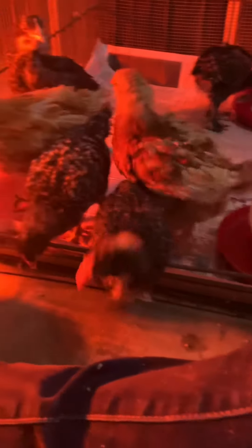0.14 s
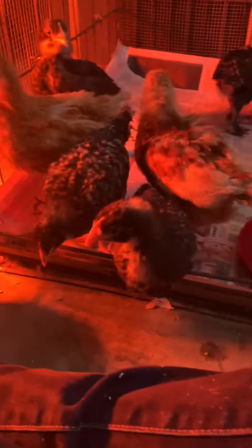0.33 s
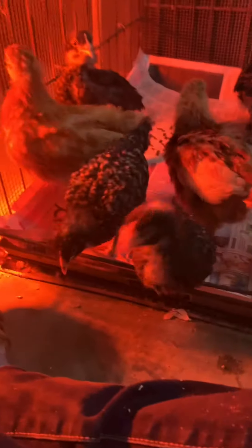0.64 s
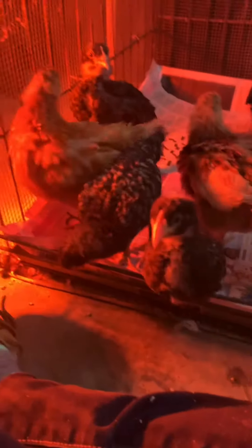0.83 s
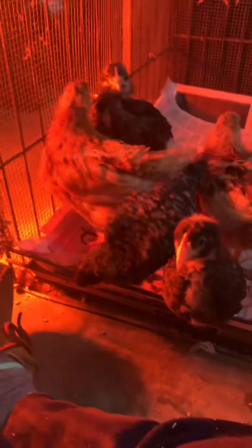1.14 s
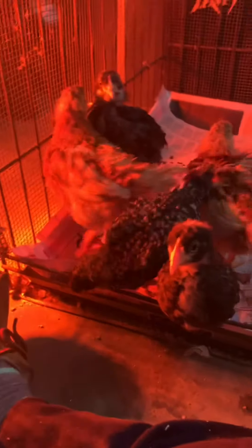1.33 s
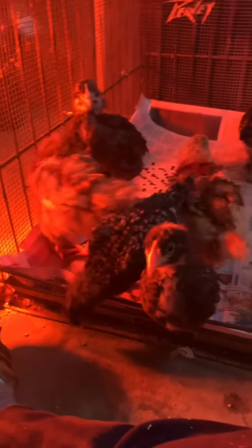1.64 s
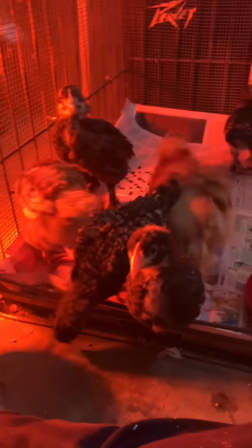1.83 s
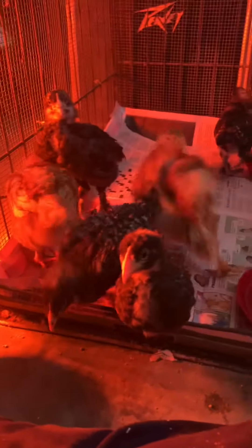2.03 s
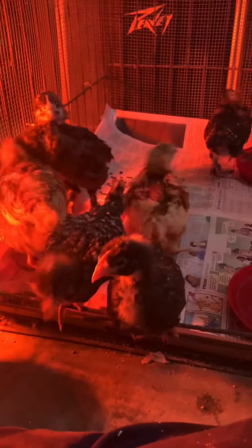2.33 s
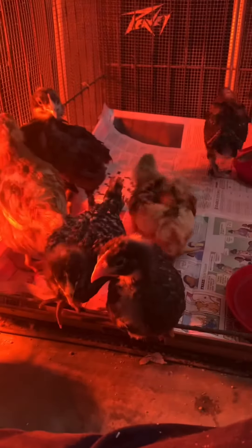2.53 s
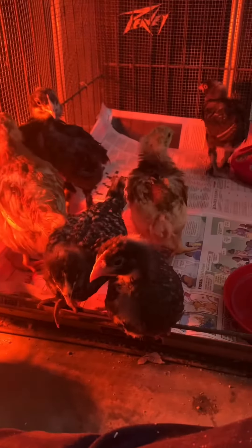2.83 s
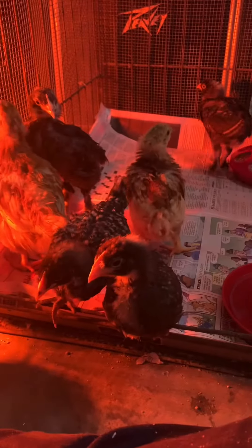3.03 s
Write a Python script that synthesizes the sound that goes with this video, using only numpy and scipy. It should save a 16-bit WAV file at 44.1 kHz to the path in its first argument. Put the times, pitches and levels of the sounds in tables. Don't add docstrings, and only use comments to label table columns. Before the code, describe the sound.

Young chickens chirp over scuffed newspaper and a faint motor hum. Loud snaps come early, a wingbeat hop thumps two-thirds through, then brighter high peeps; captured close in stereo in a small, short-echo room.

```python
import sys
import numpy as np
from scipy import signal
from scipy.fft import rfft, irfft, next_fast_len
from scipy.io import wavfile

SR = 44100
rng = np.random.default_rng(int(sys.argv[2]) if len(sys.argv) > 2 else 0)


def to_wav(s):
    ch = np.atleast_2d(s).T
    pcm = np.round(np.clip(ch, -1, 1) * 32767)
    wavfile.write(sys.argv[1], SR, pcm.astype(np.int16))


def level_to_linear(level):
    exponent = np.asarray(level, float) / 20
    return 10 ** exponent


N = 141120


def peeps(rows, first, turn, bend_in, bend_out, attack, release, octave_db=-17.5, third_db=-45, burr_db=0):
    beak_hz, beak_width_hz = 7060, 1850
    waver_depth, flutter_db = 0.0058, 3
    out, waver, flutter, burr = np.zeros(N), drift(130), drift(76), drift(450)
    for start, length, turn_hz, end_hz, db in rows:
        i, n = int(start * SR), int(length * SR)
        u = np.arange(n) / n
        into_turn = (first - 1) * np.clip(1 - u / turn, 0, 1) ** bend_in
        out_of_turn = np.clip((u - turn) / (1 - turn), 0, 1) ** bend_out
        hz = turn_hz * (1 + into_turn + waver_depth * waver[i:i + n])
        hz = hz + (end_hz - turn_hz) * out_of_turn
        phase = 2 * np.pi * np.cumsum(hz) / SR
        ramp = np.minimum(np.minimum(u / attack, (1 - u) / release), 1)
        shape = np.sin(np.pi / 2 * ramp) ** 2
        octave = level_to_linear(octave_db + 1) * np.exp(-((2 * hz - beak_hz) / beak_width_hz) ** 2)
        tone = np.sin(phase) + octave * np.sin(2 * phase) + level_to_linear(third_db) * np.sin(3 * phase)
        level_db = db + 6.5 + flutter_db * flutter[i:i + n] + burr_db * burr[i:i + n] * (1 - u)
        out[i:i + n] += tone * shape * level_to_linear(level_db)
    return out


# start in seconds, length in seconds, top in Hz, end in Hz, level in dB.
ARCH_PEEPS = [(.22, 0.042, 3705, 3200, -42), (0.487, 0.036, 3590, 3570, -45.5),
              (.586, 0.068, 3557, 2800, -44.5), (.726, 0.072, 3650, 2750, -45.5),
              (2.432, 0.061, 3490, 2960, -37.5), (.632, 0.041, 3620, 3150, -48),
              (.53, 0.049, 3700, 3600, -53.5), (.835, 0.037, 3500, 3300, -53),
              (3.003, 0.0574, 3100, 3200, -56), (.92, 0.055, 3800, 3350, -38.5)]
# start and length in seconds, top and end in Hz, level in dB.
FLICK_PEEPS = [
    (1.185, 0.067, 3630, 2060, -43.5),
    (1.66, 0.041, 3850, 3220, -53.5),
    (2.27, .058, 3360, 2380, -44),
]
# start and length in seconds, top and end in Hz, level in dB.
HIGH_PEEPS = [
    (1.05, 0.046, 4600, 2850, -52.5),
    (2.598, 0.049, 4530, 2640, -39),
    (2.738, 0.053, 4520, 2905, -35),
]
# start and length in seconds,
# top and end in Hz, level in dB.
HELD_PEEPS = [
    (1.152, 0.052, 4590, 3700, -46),
    (1.329, 0.061, 4720, 3200, -43.5),
    (1.825, 0.06, 4580, 3440, -50),
    (2.893, 0.062, 4530, 2920, -39),
]
# start and length in seconds, top and end in Hz, level in dB.
LOW_PEEPS = [
    (2.408, 0.066, 2980, 2060, -47),
    (2.558, 0.068, 2990, 2090, -47.5),
    (2.706, 0.068, 3010, 2105, -49),
]
# start and length in seconds, top and end in Hz, level in dB.
STARTLED_SQUEAK = [
    (2.001, .048, 4600, 2700, -38),
]
# start and length in seconds, first and end pitch in Hz, level in dB.
SLIDE_PEEPS = [(.742, 0.048, 2910, 2086, -48.5), (.88, 0.048, 3000, 2155, -49),
               (.926, 0.028, 4740, 4000, -44), (.972, 0.028, 3455, 2850, -43),
               (1.208, 0.029, 3370, 2996, -39.5), (1.3, 0.052, 3000, 2540, -58.5),
               (1.357, 0.041, 3110, 2160, -49), (1.51, 0.037, 3100, 2140, -48.5),
               (1.603, 0.031, 2795, 2456, -50), (1.78, 0.046, 3050, 2540, -52),
               (2.318, 0.025, 2200, 3360, -46), (2.497, 0.039, 3010, 2270, -60),
               (2.66, 0.021, 3280, 3210, -44.5), (2.671, 0.017, 3466, 3590, -43.5),
               (3.06, 0.0264, 3040, 2140, -54.5), (1.748, 0.037, 2625, 2734, -50),
               (2.437, 0.035, 3913, 3203, -42.5), (1.874, 0.012, 2590, 1850, -38),
               (1.884, 0.018, 2360, 2320, -46.5), (2.785, 0.013, 2640, 2510, -50),
               (2.63, 0.029, 2740, 2520, -53), (.335, 0.094, 3476, 3350, -55.5),
               (1.24, 0.042, 3604, 3550, -52.5), (1.24, 0.049, 3040, 2953, -51),
               (1.455, 0.031, 2553, 2490, -53)]
# start and length in seconds, low point and end in Hz, level in dB.
DIP_PEEPS = [
    (.18, 0.07, 2603, 3260, -41),
    (.338, 0.054, 2783, 2980, -45.5),
    (1.68, 0.043, 3054, 3350, -42.5),
]
# start and length in seconds, low point and end in Hz, level in dB.
SAG_PEEPS = [
    (.508, 0.0243, 2970, 2870, -43),
    (.665, 0.041, 2250, 2400, -46.5),
    (1.775, 0.0594, 2340, 2950, -47.5),
    (.785, 0.039, 3340, 4800, -40),
]
# start and length in seconds, top and end in Hz, level in dB.
SWOOP_PEEP = [
    (2.612, 0.0547, 3840, 3480, -40.5),
]


def flock():
    return (peeps(ARCH_PEEPS, .85, .3, 2.1, 1.85, .18, .14)
            + peeps(FLICK_PEEPS, .68, .247, 1.563, .98, .076, .25)
            + peeps(HIGH_PEEPS, .76, .21, 1.98, 1.45, .31, .15, burr_db=4.5)
            + peeps(HELD_PEEPS, .86, .163, 2.1, 2.9, .2, .081, burr_db=5.5)
            + peeps(LOW_PEEPS, .7, .285, 2.1, 1.4, .27, .12, third_db=-18)
            + peeps(STARTLED_SQUEAK, .45, .6, 1.7, 1.7, .12, .15, octave_db=-30)
            + peeps(SLIDE_PEEPS, 1.063, .04, .87, .98, .21, .19)
            + peeps(DIP_PEEPS, 1.33, .64, 1.6, 1.9, .2, .16)
            + peeps(SAG_PEEPS, 1.12, .68, 1.6, 1.8, .2, .2)
            + peeps(SWOOP_PEEP, .77, .318, 1.62, .71, .89, .15))


# start in seconds, peak level in dB, low knock over the snap in dB.
PECKS = [(0.0494, -33.5, -3.5), (0.1444, -38, -5), (0.302, -19.5, -20.5), (0.9192, -42, 7.5),
         (1.012, -24, -2.5), (1.031, -11.5, -12), (1.3839, -35, -10.5), (1.4554, -44.5, 12.5),
         (1.5213, -38.5, 3), (1.5925, -37.5, -1), (1.8912, -21, -12), (1.8546, -30.5, -4.5),
         (1.8768, -33, -3), (1.924, -43, -1), (2.05, -20, -7.5), (2.1416, -28, 1.5), (2.6618, -40.5, -8.5),
         (3.024, -47, -17)]
# frequency in Hz, density in dB per Hz.
SNAP_SPECTRUM = [(1500, -25), (3000, -6), (5500, 2), (8000, -0.5), (10500, -3), (14000, -7)]


def ticks():
    snap_t60_s, knock_t60_s, knock_hz = 0.0069, 0.058, 1160
    snap, knock, t = np.zeros(N), np.zeros(N), np.arange(2205) / SR
    draws = rng.standard_normal((len(PECKS), 2, len(t)))
    for (start, db, low_db), (snap_noise, knock_noise) in zip(PECKS, draws):
        i = int(start * SR)
        snap[i:i + len(t)] += level_to_linear(db + 3.5 - 60 * t / snap_t60_s) * snap_noise
        knock[i:i + len(t)] += level_to_linear(db + low_db + 7 - 60 * t / knock_t60_s) * knock_noise
    band = signal.butter(1, [knock_hz * 0.64, knock_hz * 2.0], "band", fs=SR, output="sos")
    return colour(snap, SNAP_SPECTRUM) + signal.sosfilt(band, knock)


# start in seconds, level in dB.
FOOTFALLS = [
    (2.059, -25),
    (2.073, -25.5),
    (2.096, -28),
    (2.108, -30),
    (2.144, -29),
    (2.158, -27),
    (2.19, -36),
    (2.215, -40),
    (.921, -35.5),
]
# frequency in Hz, level in dB, decay t60 in seconds.
TRAY_MODES = [(238, -8.5, 0.045), (345, -6.5, 0.058), (475, -3.5, 0.053), (551, -3.5, 0.066),
              (705, -6.5, .05), (1120, -4, 0.047), (1383, -11, .04), (1813, -11.5, 0.039)]


def tray():
    out, luck_db = np.zeros((2, N)), rng.normal(0, 3.0, (len(FOOTFALLS), len(TRAY_MODES), 2))
    start, db = np.transpose(FOOTFALLS)
    for k, (hz, level_db, t60) in enumerate(TRAY_MODES):
        clicks = np.full((2, N), 1e-18)
        clicks[:, (start * SR).astype(int)] = level_to_linear(db + level_db + luck_db[:, k].T)
        r, w = level_to_linear(-60 / (t60 * SR)), 2 * np.pi * hz / SR
        ringing = signal.lfilter([0, np.sin(w)], [1, -2 * r * np.cos(w), r * r], clicks)
        out += ringing * (-1) ** k
    return out


# start in seconds, decay t60 in seconds, level in dB.
WING_BEATS = [
    (2.049, 0.17, -23),
    (2.138, 0.21, -32.5),
]
# frequency in Hz, density in dB per Hz.
WING_SPECTRUM = [(220, -9), (520, 0), (850, -9), (1300, -7), (3000, -14), (9000, -21), (16000, -30)]


def wings():
    t = np.arange(N) / SR
    envelope = np.zeros(N)
    for start, t60, db in WING_BEATS:
        rise = np.clip((t - start) / 0.017, 0, 1) ** 2
        envelope += level_to_linear(db - 60 * np.clip(t - start, 0, None) / t60) * rise
    return envelope * rustle(WING_SPECTRUM, size_db=3.5)


# start in seconds, length in seconds, level in dB.
FOOT_SCUFFS = [(0.045, 0.017, -40.5), (0.212, 0.19, -54), (0.903, 0.068, -44.5), (0.973, 0.067, -37),
               (1.376, 0.048, -44.5), (1.446, 0.13, -52), (1.499, 0.034, -54), (1.711, 0.11, -51),
               (1.813, 0.16, -43), (2.038, 0.035, -30.5), (2.412, 0.12, -54), (1.189, 0.068, -51),
               (2.265, 0.054, -54.5), (2.568, 0.079, -54.5)]
# frequency in Hz, density in dB per Hz.
PAPER_SPECTRUM = [(250, -1), (1300, 0.5), (2500, -6.5), (5000, 5), (9000, -5), (12000, -3), (16000, -18.5)]


def scuffs():
    t = np.arange(N) / SR
    envelope = np.zeros(N)
    for start, length, db in FOOT_SCUFFS:
        u = np.clip((t - start) / length, 0, None)
        envelope += level_to_linear(db) * 2.7 * u / .35 * np.exp(-u / .35)
    return envelope * rustle(PAPER_SPECTRUM, size_db=4.0)


# time in seconds, level in dB.
SHUFFLE_LEVEL = [
    (0, -50),
    (.45, -71.5),
    (.75, -51),
    (1.15, -59.5),
    (1.85, -55),
    (2.3, -61.5),
    (2.75, -59),
    (3.2, -90),
]


def shuffle():
    hiss = rustle([(3000, 5), (9000, -11), (12000, -14.5), (15500, -23.5)], size_db=2.5)
    level_db = np.interp(np.arange(N) / SR, *np.transpose(SHUFFLE_LEVEL))
    return level_to_linear(level_db + 0.87 * drift(2.7)) * hiss


# frequency in Hz, density in dB per Hz.
AIR_SPECTRUM = [(40, -45.5), (62, -6.5), (125, -1.5), (330, -2), (700, -16), (2000, -22.5), (6900, -48.5)]
# frequency in Hz, width in Hz, level in dB.
MOTOR_LINES = [
    (66.7, 12.5, -56.5),
    (123.3, 3.3, -55),
    (173.6, 3.66, -49.5),
    (715.4, 18, -65.5),
]


def fan():
    t = np.arange(N) / SR
    lines = np.zeros(N)
    for hz, width_hz, db in MOTOR_LINES:
        level = level_to_linear(db + 3 + 1.5 * drift(width_hz))
        lines += level * np.sin(2 * np.pi * hz * t + 1.2 * drift(width_hz))
    air = rms_one(spread(colour(rng.standard_normal((2, N)), AIR_SPECTRUM)))
    return level_to_linear(-47.5 + 0.27 * drift(2)) * air + lines


def room(x):
    t60_s, level_db, wall_echo_s = 0.14, -9, 0.052
    t = np.arange(SR // 2) / SR
    shared, own = rng.standard_normal(len(t)), rng.standard_normal((2, len(t)))
    own = signal.sosfilt(signal.butter(3, [1800, 4200], "band", fs=SR, output="sos"), own)
    tail = (shared + 1.35 * own) * level_to_linear(-60 * t / t60_s) * np.clip(t / 0.01, .3, 1)
    tail = tail * (1 + 2.15 * np.exp(-((t - wall_echo_s) / 0.0073) ** 2))
    tail = signal.lfilter([1], [1, -.3], tail)
    tail = tail / np.sqrt(np.sum(tail ** 2) / 2)
    return level_to_linear(level_db) * signal.fftconvolve(x, tail, axes=1)[:, :N]


def rustle(spectrum, size_db):
    grains_per_s = 1500
    size = level_to_linear(size_db * np.minimum(rng.exponential(1, (2, N)), 4))
    grains = (rng.random((2, N)) < grains_per_s / SR) * size
    noise = (grains + .5) * rng.standard_normal((2, N))
    return rms_one(spread(colour(noise, spectrum))) * level_to_linear(3.6 * drift(75))


# frequency in Hz, likeness from 0 to 1.
LIKENESS = [(150, .98), (400, .75), (1000, .92), (2500, .7), (4800, .995)]


def spread(x):
    alike = np.clip(at_hz(LIKENESS, np.fft.rfftfreq(N, 1 / SR)), 0, 1)
    mid = rfft(x[0]) * np.sqrt(.5 + alike / 2)
    side = rfft(x[1]) * np.sqrt(.5 - alike / 2)
    return irfft(np.array([mid + side, mid - side]), N)


def colour(x, points):
    hz = np.fft.rfftfreq(x.shape[-1], 1 / SR)
    gain = level_to_linear(at_hz(points, hz)) * np.minimum(hz / points[0][0], 1) ** 4
    return irfft(rfft(x) * gain / np.sqrt(np.mean(gain ** 2)), x.shape[-1])


def at_hz(points, hz):
    p = np.array(points)
    return np.interp(np.log(hz + 1), np.log(p[:, 0]), p[:, 1])


def drift(rate):
    r = np.exp(-2 * np.pi * rate / SR)
    return rms_one(signal.lfilter([1], [1, -2 * r, r * r], rng.standard_normal(N + SR))[SR:])


def rms_one(x):
    return x / np.sqrt(np.mean(x ** 2) + 1e-20)


def scene():
    birds, near = flock() + scuffs() + wings() + tray(), ticks()
    return birds + near + room(birds + 1.08 * near) + fan() + shuffle()


def low_pass(x):
    return signal.sosfilt(signal.butter(12, 16970, fs=SR, output="sos"), x)


# frequency in Hz, lead in radians.
LEFT_LEAD = [(0, 0), (1500, .5), (3900, 1.4), (4900, 3.0), (5600, 3.3), (6800, 5.4), (10200, 7),
             (11100, 9.25), (13700, 9.6), (14800, 12.3), (22050, 16)]
# frequency in Hz, level in dB.
LEFT_OVER_RIGHT = [(30, -.5), (300, -3), (900, -1.8), (3000, -2.7), (4800, 0)]


def record(dry):
    size = next_fast_len(N + 512)
    hz = np.fft.rfftfreq(size, 1 / SR)
    lead = np.exp(1j * np.interp(hz, *np.transpose(LEFT_LEAD)))
    left = irfft(rfft(dry[0], size) * level_to_linear(at_hz(LEFT_OVER_RIGHT, hz)) * lead, size)[:N]
    low_cut = signal.butter(3, 45, "high", fs=SR, output="sos")
    top_cut = signal.cheby2(10, 50, 16950, fs=SR, output="sos")
    limited = 0.77 * np.tanh(signal.sosfilt(low_cut, [left, dry[1]]) / 0.73)
    return low_pass(signal.sosfilt(top_cut, limited))


dry = scene()
out = record(dry)
to_wav(out)
```